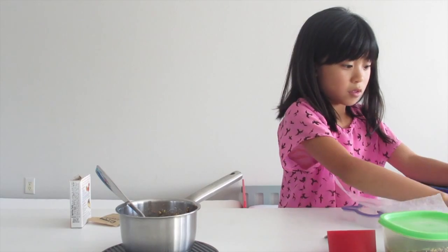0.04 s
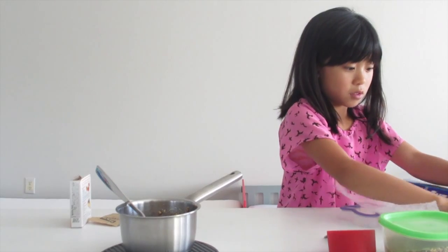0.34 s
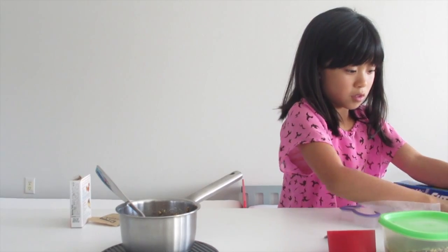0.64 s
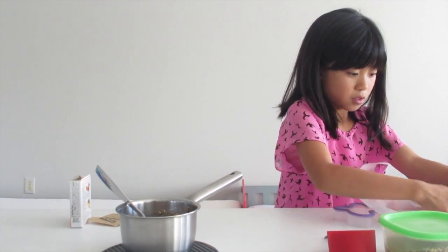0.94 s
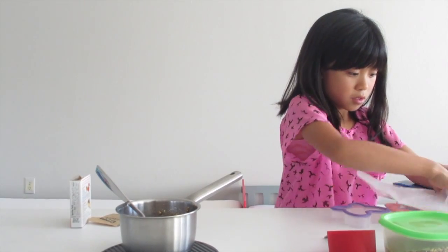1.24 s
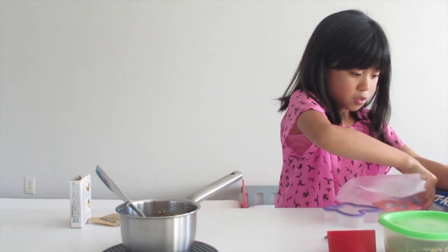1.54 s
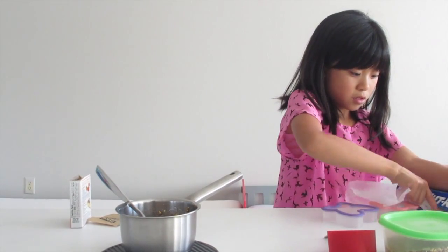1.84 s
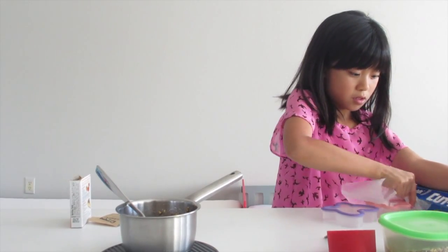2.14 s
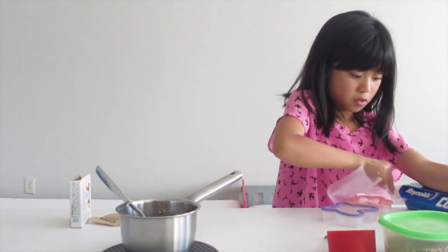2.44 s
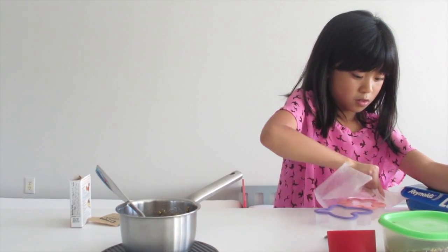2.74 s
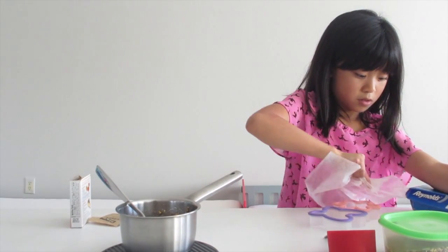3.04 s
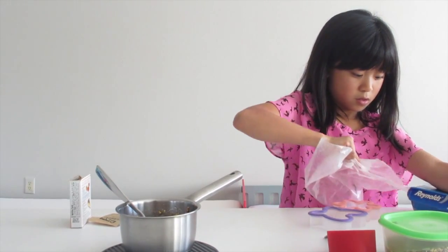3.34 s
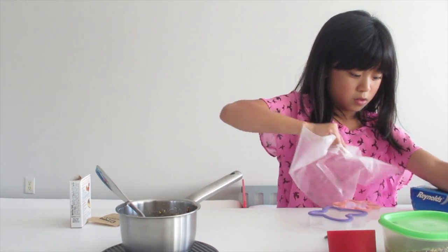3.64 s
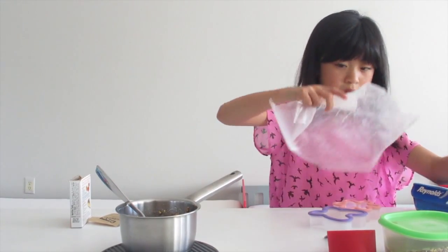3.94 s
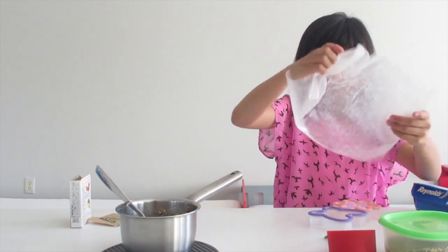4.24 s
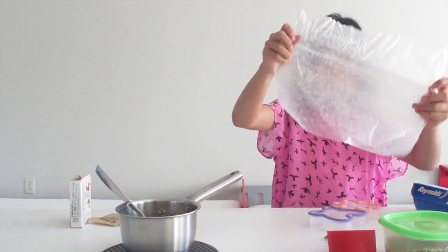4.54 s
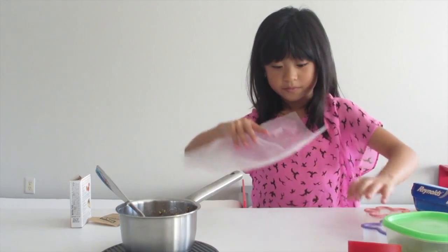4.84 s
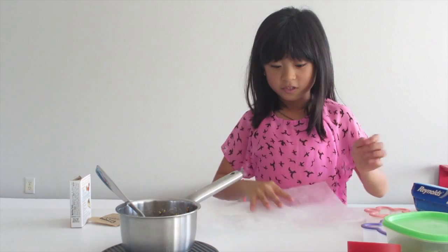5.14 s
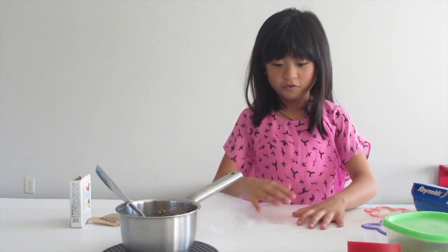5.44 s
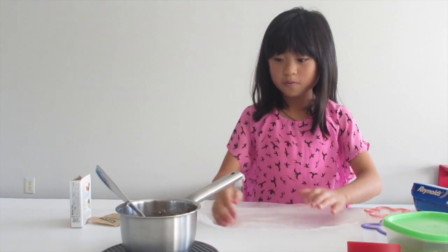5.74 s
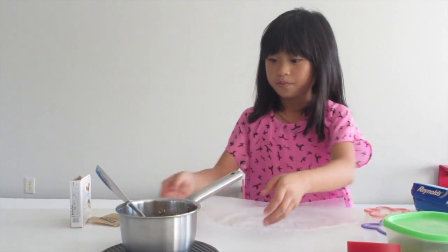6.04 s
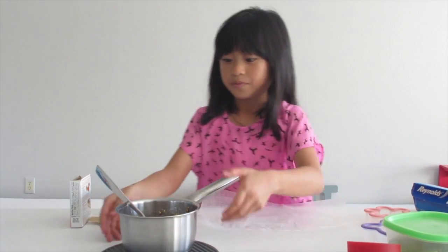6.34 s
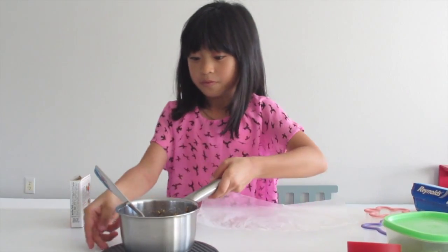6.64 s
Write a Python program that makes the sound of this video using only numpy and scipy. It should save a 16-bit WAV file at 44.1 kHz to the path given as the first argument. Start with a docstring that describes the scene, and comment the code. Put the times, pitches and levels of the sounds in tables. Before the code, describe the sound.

Wax paper rustles and crackles as it is pulled out, the roll knocking hollowly in its carton. It tears along the toothed edge in a quick run of ticks, and the carton is set down with a thud. The sheet crinkles loudly, gives one sharp pop, then is patted and brushed softly onto a table. The sound is fairly close, in a small, quiet, bare room.

```python
"""Wax paper crinkles as it is pulled from its carton, torn off along the toothed edge, shaken out and
smoothed onto a table. Countless tiny creases buckle as the sheet moves, and larger ones snap singly.
Impacts excite damped modes: the roll knocks in the carton, the carton is set down, the sheet pops taut
once and hands pat the table. Friction adds hiss and hollow drones, all in a small, quiet, bare room."""
import sys
import numpy as np
from scipy import signal
from scipy.io import wavfile
from scipy.ndimage import uniform_filter1d

SR = 44100
rng = np.random.default_rng(int(sys.argv[2]) if len(sys.argv) > 2 else 0)


def wrap_up_sound(samples):
    """Save the sound to the file named by the first command line argument, as 16-bit audio."""
    columns = np.atleast_2d(samples).T
    # keep every value between -1 and 1, then stretch to whole-number steps
    tamed = np.clip(columns, -1, 1)
    steps = np.round(tamed * 32767).astype(np.int16)
    wavfile.write(sys.argv[1], SR, steps)


N = 303408
TIME = np.arange(N) / SR
CUTOFF_HZ = 15000
EDGES_HZ = 22 * 2 ** (np.arange(20) / 2)   # half-octave bands
CENTRES_HZ = np.sqrt(EDGES_HZ[1:] * EDGES_HZ[:-1])


def from_db(db):
    """Amplitude ratio of a level in decibels."""
    return 10 ** (np.asarray(db) / 20)


def unit_rms(x):
    """Normalisation to unit mean power."""
    return x / np.sqrt(np.mean(x ** 2) + 1e-20)


def at_hz(points, hz):
    """Interpolation on a logarithmic frequency axis."""
    f, value = np.transpose(points)
    return np.interp(np.log(hz), np.log(f), value)


def band(x, index):
    """Butterworth band-pass, half an octave wide."""
    sos = signal.butter(2, EDGES_HZ[index:index + 2], "band", fs=SR, output="sos")
    return signal.sosfilt(sos, x + 1e-18)


def low_pass(x, hz, order=2):
    """Butterworth roll-off above hz."""
    return signal.sosfilt(signal.butter(order, min(hz, SR / 2 - 100), fs=SR, output="sos"), x + 1e-18)


def impulses(times, sizes):
    """An impulse train of given times and amplitudes."""
    return np.bincount(np.round(np.asarray(times) * SR).astype(int), sizes, N)[:N]


def ring(x, hz, t60):
    """A damped oscillator: a unit impulse starts a decaying sine of amplitude 1."""
    r, w = from_db(-60 / (t60 * SR)), 2 * np.pi * hz / SR
    return signal.lfilter([0, np.sin(w)], [1, -2 * r * np.cos(w), r * r], x + 1e-18)


def body(x, modes):
    """Modal superposition, with alternating signs."""
    return sum((-1) ** k * from_db(db) * ring(x, hz, t60) for k, (hz, db, t60) in enumerate(modes))


def facet(x, hz, q):
    """The broad resonance of a stiff patch of paper."""
    return signal.lfilter(*signal.iirpeak(min(hz, SR / 4), max(hz / (SR / 4), q), fs=SR), x)


def swells(rows):
    """A sum of Gaussian envelopes; each half-width is a standard deviation."""
    return sum(from_db(db) * np.exp(-((TIME - t) / half) ** 2 / 2) for t, db, half in rows)


def drift(per_s):
    """Random modulation of unit rms, linear between knots."""
    knots = rng.standard_normal(int(TIME[-1] * per_s) + 2)
    return unit_rms(np.interp(TIME * per_s, np.arange(len(knots)), knots))


def cracks(rows, centre_hz, spread, run_s, q, dull_hz):
    """Transient excitation: a fold runs along a crease and rings the facet beside it."""
    out, age = np.zeros(N), np.arange(SR // 50) / SR
    noises = rng.standard_normal((len(rows), len(age)))
    for (t, db), hz, noise in zip(rows, np.broadcast_to(centre_hz, len(rows)), noises):
        slip = noise * age * np.exp(-age / run_s)
        crack = low_pass(facet(slip, hz * np.exp(spread * noise[0]), q), dull_hz)
        start = round(t * SR)
        out[start:start + len(age)] += from_db(db) * crack / np.abs(crack).max()
    return out


def blow(rows, modes, soft_hz):
    """Modal response to a rounded force pulse, scaled to its peak level."""
    t, db = np.transpose(rows)
    sound = low_pass(body(impulses(t, from_db(db)), modes), soft_hz, order=4)
    return from_db(db.max()) * sound / np.abs(sound).max()


# crinkling between moves: t/s, level/dB
STIR = [(0.0, -43), (0.14, -49), (0.5, -41.5), (1.85, -45), (2.6, -40.5), (3.1, -34.5), (3.8, -41.5),
        (4.3, -47.5), (4.62, -38), (4.9, -66), (5.25, -53), (5.42, -57.5), (5.77, -52), (6.0, -57),
        (6.88, -59)]
# moves of the hands: t/s, attack/s, hold/s, mid-hold crinkling level/dB, swell over the hold/dB,
# panel flexing/dB re crinkling, fine crackle/dB re crinkling
MOVES = [(0.162, 0.009, 0.14, -42, -4, -3, -18), (0.352, 0.011, 0.14, -41, -23, -20, -7.5),
         (0.529, 0.0071, 0.3, -42, -6, -11, -4), (0.685, 0.0027, 0.17, -23.5, -14, -8, -5),
         (0.813, 0.012, 0.3, -38.5, -1.5, -4.5, -7), (1.151, 0.0095, 0.289, -31.5, 5.5, -7, -6.5),
         (1.468, 0.0049, 0.04, -21, -3, -10, -8), (1.555, 0.016, 0.15, -23.5, -2.5, -10.5, -12),
         (1.858, 0.0087, 0.39, -35.5, 3, -2.5, -7), (2.218, 0.0026, 0.3, -26, 1, -5.5, -9.5),
         (2.677, 0.0091, 0.22, -35.5, 2.5, 1.5, -11.5), (2.878, 0.068, 0.088, -28, 3, -4, -4),
         (3.134, 0.01, 0.14, -38, -18, 4, -5), (3.595, 0.022, 0.093, -31.5, 0.5, -5.5, -8),
         (3.884, 0.0073, 0.086, -37, -1.5, -4.5, -39), (4.348, 0.0051, 0.15, -32, 10, -0.5, 3.5),
         (4.636, 0.038, 0.12, -24, 1, -1, -46), (5.139, 0.026, 0.09, -47.5, -11.5, -3, -2),
         (5.45, 0.0067, 0.057, -49.5, 4.5, 13.5, 9.5), (5.635, 0.048, 0.019, -30.5, -3, -10, 2)]


def handling(stir_flex_db=-7, stir_fine_db=-6, release_db_per_s=215):
    """Incoherent sources add in power: the levels in dB of flexing, crinkling and fine crackle."""
    stir_db = np.interp(TIME, *np.transpose(STIR))
    power = from_db([stir_db + stir_flex_db, stir_db, stir_db + stir_fine_db]) ** 2
    for start, attack, hold, db, swell_db, flex_db, fine_db in MOVES:
        age = TIME - start
        held_db = db + swell_db * (np.clip(age / hold, 0, 1) - .5)
        released_db = release_db_per_s * np.clip(age - hold, 0, 1)
        gain = np.clip(age / attack, 0, 1) * from_db(held_db - released_db)
        power = power + np.outer(from_db([flex_db, 0, fine_db]), gain) ** 2
    return 10 * np.log10(power)


# half-octave spectrum of the paper: f/Hz, relative level/dB
PAPER_SPECTRUM = [(100, -21), (165, -17.5), (270, -9.5), (600, -5), (1200, -8), (3300, -4.5), (6700, -2.5),
                  (9500, -6.5), (13400, -14)]
# the sheet goes from creasing to sliding: t/s, amplitude ratio of hiss to creases
SLIDING = [(4.6, 0.64), (4.68, 1.53)]


def crinkle(flex_db, mid_db, fine_db, creases_per_s=600, run_s=0.0014, even_s=0.03):
    """Buckling as a Poisson process: the harder the sheet is worked, the more tiny creases give way."""
    rate = creases_per_s * from_db(0.78 * (mid_db - np.median(mid_db)))
    onsets = np.flatnonzero(rng.random(N) < rate / SR)
    sizes_db = 5.5 * np.minimum(rng.exponential(1, N), 3)[onsets]
    colour_phase = rng.uniform(0, 2 * np.pi, N)[onsets]
    clumped_noise = from_db(2.5 * drift(per_s=70)) * rng.standard_normal((2, N))
    hiss_power = np.interp(TIME, *np.transpose(SLIDING)) ** 2
    decay = np.exp(-1 / (run_s * SR))
    out = np.zeros(N)
    for k in np.flatnonzero(CENTRES_HZ > 80):
        # broad panels carry the lows, creases the middle, the stiff wax coat the top
        hz = CENTRES_HZ[k]
        low, top = at_hz([(450, 1), (1100, 0)], hz), at_hz([(2900, 0), (6800, 1)], hz)
        level = mid_db + low * (flex_db - mid_db) + top * (fine_db - mid_db) + at_hz(PAPER_SPECTRUM, hz)
        # each facet favours its own pitches, and harder creases stand out in the treble
        sizes = from_db(sizes_db * (0.5 + top / 2) + 4.0 * np.cos(k + colour_phase))
        power = signal.lfilter([1], [1, -decay], impulses(TIME[onsets], sizes ** 2) + 1e-18)
        local_mean = np.abs(uniform_filter1d(power, int(even_s * SR))) + 1e-3
        envelope = np.sqrt((power / local_mean + hiss_power) / (1 + hiss_power))
        out += from_db(level) * unit_rms(band(envelope * clumped_noise[k % 2], k))
    return out


# room noise: f/Hz, relative spectral density/dB
NOISE_SPECTRUM = [(25, -9.5), (130, -12), (300, -14.5), (600, -23), (1800, -23), (2300, -30), (6000, -37.5),
                  (15000, -48)]
# faint whine: f/Hz, level/dB
WHINE = [(1897, -68)]


def background(noise_db=-51):
    """Stationary noise: a broadband floor and a thin narrow-band whine."""
    white = rng.standard_normal((3, N))
    floor = sum(from_db(at_hz(NOISE_SPECTRUM, hz)) * band(white[k % 2], k)
                for k, hz in enumerate(CENTRES_HZ))
    whine = sum(from_db(db) * unit_rms(ring(white[2], hz, t60=0.085)) for hz, db in WHINE)
    return from_db(noise_db) * unit_rms(floor) + whine


# large creases giving way: t/s, peak level/dB
SNAPS = [(0.1945, -15.5), (0.4574, -18), (1.0116, -15), (1.1705, -20), (1.2347, -14), (1.995, -20.5),
         (2.682, -22.5), (3.145, -11.5), (3.149, -12.5), (4.15, -22.5), (4.2283, -19.5), (4.3008, -23),
         (4.3595, -11), (4.366, -10.5), (4.4124, -8.5), (4.6414, -15), (5.4578, -21), (5.4983, -19)]


def snaps():
    """Snap-through buckling: the larger creases release their elastic energy one by one."""
    return cracks(SNAPS, centre_hz=3900, spread=0.053, run_s=0.0014, q=1.0, dull_hz=14200)


# modes of the carton walls: f/Hz, relative level/dB, T60/s
CARTON_MODES = [(152, -23, 0.035), (287.6, -10.5, 0.056), (467, -10, 0.026), (785, -10.5, 0.012),
                (978, -14, 0.043), (1370, -9.5, 0.01), (3060, -8.5, 0.0087)]
# turns of the roll: t/s, level/dB, half-width/s
ROLL_TURNS = [(0.275, -42, 0.042), (0.71, -24, 0.013), (1.585, -23.5, 0.0076), (1.656, -23, 0.011),
              (2.42, -30.5, 0.04)]


def roll(slips_per_s=500):
    """Stick-slip friction: the turning roll drives the hollow modes of the carton."""
    slips = (rng.random(N) < slips_per_s / SR) * rng.choice([-1, 1], N)
    return swells(ROLL_TURNS) * unit_rms(body(slips, CARTON_MODES))


def stray_snaps(fine_db, count=130, span_s=(0.3, 5.4), above_db=24, spread_db=7, ceiling_db=-15):
    """Random buckling: short creases snap, each at its own pitch, peaking above the fine crackle."""
    when, size = rng.random((count, 2)).T
    times = np.interp(when, [0, 1], span_s)
    peak_db = np.interp(times, TIME, fine_db) + above_db + spread_db * (2 * size - 1)
    rows = list(zip(times, np.minimum(peak_db, ceiling_db)))
    return cracks(rows, centre_hz=5200, spread=0.68, run_s=0.0002, q=3.2, dull_hz=14000)


# jolts from the roll and from paper giving way at the teeth: t/s, relative level/dB
JOLTS = [(0.688, -7), (1.471, -11.5), (1.477, -8), (1.616, -6.5), (2.219, -10), (2.224, -1.5), (2.230, -16),
         (2.438, -10.5), (2.497, -11.5), (2.751, -14.5), (3.300, -15), (3.348, -9.5), (3.358, -9),
         (3.383, -8), (3.394, -10), (3.4235, -6), (3.4295, -12), (3.4425, -8.5), (3.451, -4), (3.470, -5.5),
         (3.4938, -5), (3.5117, -6), (3.5493, -12.5), (3.583, -7.5), (3.611, -17.5), (3.649, -10),
         (3.6665, -17.5), (3.699, -10)]
# pitch of their tick, lowest in the thick of the tear: t/s, f/Hz
TICK_PITCH = [(3.3, 2430), (3.44, 1120), (3.7, 1780)]


def carton_jolts(tick_db=-1.35, split_db=-7.5, boom_db=-0.5, detune=0.022, run_s=0.00047):
    """Impulse response: each jolt is a tick, a bright split of paper and a boom of the carton walls."""
    tick_hz = np.interp([t for t, db in JOLTS], *np.transpose(TICK_PITCH))
    ticks = cracks(JOLTS, centre_hz=tick_hz, spread=0.033, run_s=run_s, q=1, dull_hz=3470)
    splits = cracks(JOLTS, centre_hz=7100, spread=0, run_s=run_s, q=1, dull_hz=CUTOFF_HZ)
    out = from_db(tick_db) * ticks + from_db(split_db) * splits
    for t, db in JOLTS:
        # the pitch of the walls shifts with the grip
        walls = [(hz * np.exp(detune * rng.standard_normal()), level, t60)
                 for hz, level, t60 in CARTON_MODES]
        boom = body(signal.unit_impulse(SR // 10), walls)
        start = round(t * SR)
        out[start:start + len(boom)] += from_db(db + boom_db) * boom
    return out


# quick runs of tearing or crumpling: t/s, level/dB, half-width/s, f/Hz, fade per jerk/dB
RIPS = [(0.714, -18, 0.019, 3100, 9), (1.51, -20, 0.012, 5150, 27), (1.578, -24.5, 0.013, 5430, 20),
        (2.454, -28.5, 0.02, 6060, 17), (4.49, -13, 0.0098, 4540, 4)]


def rips(jerks_per_s=260, unevenness=0.5):
    """Intermittent fracture: fibres part in uneven jerks, each fading until the next, in a bright rasp."""
    jerk_phase = np.cumsum(jerks_per_s * np.exp(unevenness * drift(jerks_per_s))) / SR % 1
    fibres = rng.standard_normal(N)
    out = np.zeros(N)
    for t, db, half, hz, fade_db in RIPS:
        rasp = facet(fibres * from_db(-fade_db * jerk_phase), hz, q=1.7)
        out += swells([(t, db, half)]) * unit_rms(low_pass(rasp, hz=10500))
    return out


# puffs of air: t/s, level/dB, half-width/s
WAFTS = [(.75, -34, 0.03), (4.03, -34.5, 0.04), (5.76, -54, 0.13)]


def wafts():
    """Air displacement: the sheet or an arm pushes a puff of low-frequency noise."""
    return swells(WAFTS) * unit_rms(ring(rng.standard_normal(N), hz=62, t60=0.011))


# hollow drones of the roll turning in its carton, then of the sheet, a palm and an arm sliding:
# t/s, level/dB, half-width/s, f/Hz, relative pitch glide/(1/s)
RUBS = [(1.483, -23, 0.0095, 182, 4), (1.71, -28, 0.013, 270, 0), (2.84, -34, 0.044, 590, 0),
        (4.834, -29, 0.0091, 246, -10), (5.553, -46, 0.037, 2400, 0.5), (5.638, -30.5, 0.01, 750, -1.5),
        (6.663, -44, 0.08, 290, 1), (6.716, -45.5, 0.037, 660, -1.5)]


def rubs(t60_at_300_hz=0.035):
    """Friction-driven resonance: hollow drones, most gliding in pitch, the higher ones more damped."""
    friction = np.diff(rng.standard_normal(N + 1))   # a slipping contact has no deep bass
    out = np.zeros(N)
    for t, db, half, hz, glide in RUBS:
        drone = unit_rms(ring(friction, hz, t60_at_300_hz * np.sqrt(300 / hz)))
        warped_time = TIME + glide * (TIME - t) ** 2 / 2
        out += swells([(t, db, half)]) * np.interp(warped_time, TIME, drone)
    return out


# the carton landing: t/s, peak level/dB
SET_DOWN = [(3.9915, -9)]
# modes of its thud: f/Hz, relative level/dB, T60/s
THUD_MODES = [(125.4, -16, 0.2), (290, 2.5, 0.04), (384, 6, 0.013), (774, -11, 0.024), (1130, -5.5, 0.0084)]


def carton_thud():
    """Soft impact: setting the carton down excites mainly low modes."""
    return blow(SET_DOWN, THUD_MODES, soft_hz=1260)


# the sheet popping taut: t/s, peak level/dB
POP = [(4.960, 2)]
# modes of the taut sheet: f/Hz, relative level/dB, T60/s
SHEET_MODES = [(480, -20.5, 0.011), (1060, -10, 0.0025), (1980, -7, 0.0031), (2416, -7, 0.0036),
               (3780, -8, 0.0025)]


def sheet_pop():
    """Sudden tension: the sheet rings briefly as a heavily damped membrane."""
    return blow(POP, SHEET_MODES, soft_hz=5900)


# the sheet skimming the table: t/s, level/dB, half-width/s
BRUSHES = [(5.22, -51.5, 0.13), (5.672, -47, 0.051), (5.77, -49, 0.1)]


def brushes(grain_db=6.0):
    """Sliding friction: waxed paper on the table gives a bright, grainy hiss."""
    grains = rng.standard_normal(N) * from_db(grain_db * drift(per_s=500))
    return swells(BRUSHES) * unit_rms(facet(grains, hz=6000, q=0.94))


# hands on the table: t/s, impulse level/dB, cut-off f/Hz
PATS = [(5.464, -37, 2500), (5.498, -26, 4100), (5.505, -30, 900), (6.676, -18.5, 60), (6.702, -43, 710)]
# modes of the table top: f/Hz, gain/dB, T60/s
TABLE_MODES = [(68.5, -6.5, 0.17), (131, -7, 0.14), (302, -11, 0.08), (573, 0.5, 0.062), (2310, 7, 0.018)]


def pats():
    """Compliant contact: a soft hand low-passes the force that rings the table top."""
    force = sum(low_pass(impulses([t], [from_db(db)]), hz, order=1) for t, db, hz in PATS)
    return body(force, TABLE_MODES)


# reverberation time of the room: f/Hz, T60/s
ROOM_T60 = [(150, 0.46), (2500, 0.47), (7000, 0.4)]


def room(x, wet_db=-6.5, treble_db=-10.0, build_s=0.00085, early_db=7.5, early_s=0.0029, positions=32):
    """Reverberation: dense reflections decay band by band, in a new pattern wherever the sheet moves."""
    age = np.arange(SR // 2) / SR
    white = rng.standard_normal((2, positions, len(age)))
    tails = sum(band(white[k % 2], k) * from_db(-60 * age / at_hz(ROOM_T60, hz))
                for k, hz in enumerate(CENTRES_HZ))
    tails *= 1 - np.exp(-(age / build_s) ** 2)
    tails *= from_db(early_db * np.exp(-age / early_s))
    tails /= np.sqrt(np.sum(tails ** 2, axis=1, keepdims=True))
    dull = low_pass(tails, hz=3130, order=1)
    tails = dull + from_db(treble_db) * (tails - dull)
    out = np.zeros(N + len(age))
    for part, tail in zip(np.array_split(np.arange(N), positions), tails):
        out[part[0]:part[-1] + len(age)] += signal.fftconvolve(x[part], tail)
    return from_db(wet_db) * out[:N]


def scene(carton_room_db=2.5, pop_room_db=7.5):
    """Direct plus reverberant field: the directional carton and pop feed the room by their own shares."""
    flex_db, mid_db, fine_db = handling()
    paper = crinkle(flex_db, mid_db, fine_db) + snaps() + stray_snaps(fine_db) + rips() + brushes()
    diffuse = paper + rubs() + carton_thud() + pats()
    carton = carton_jolts() + roll()
    pop = sheet_pop()
    dull_pop = low_pass(pop, hz=1200, order=1)
    reverb = room(diffuse + from_db(carton_room_db) * carton + from_db(pop_room_db) * dull_pop)
    return (diffuse + carton + pop + reverb + background() + wafts())[None]


def record(dry):
    """Hard clipping flattens the highest peaks, and a steep low-pass limits the bandwidth."""
    top_cut = signal.ellip(10, .1, 90, CUTOFF_HZ, fs=SR, output="sos")
    return signal.sosfilt(top_cut, np.clip(dry, -.88, .88))


dry = scene()
out = record(dry)
wrap_up_sound(out)
```